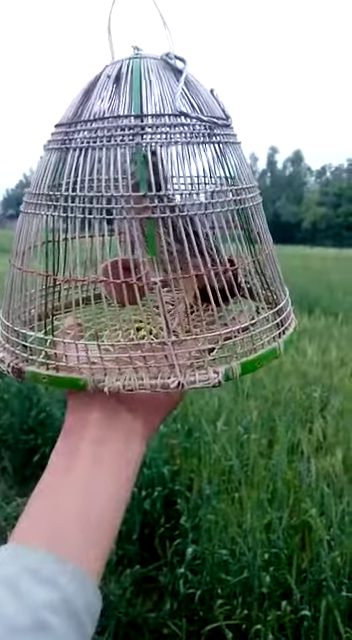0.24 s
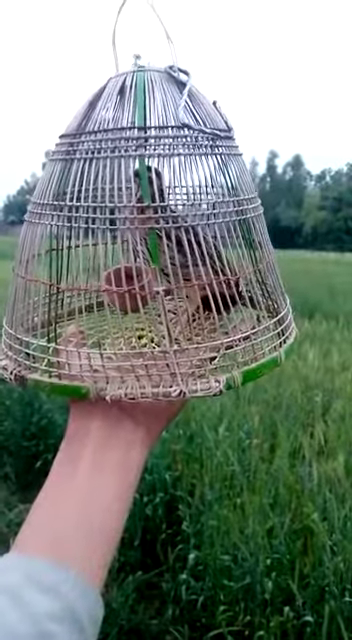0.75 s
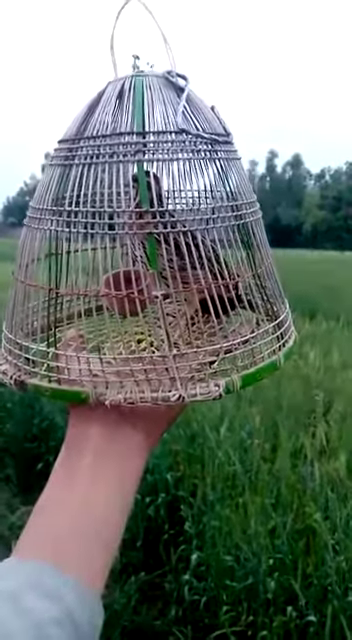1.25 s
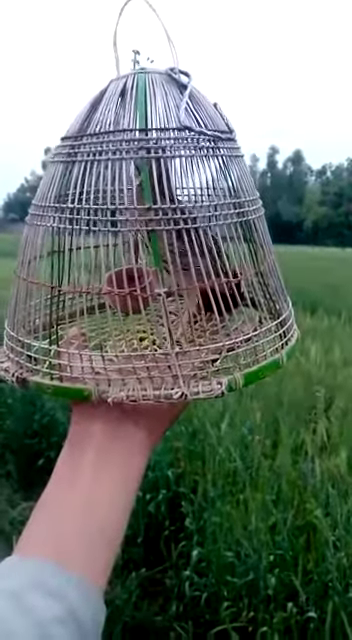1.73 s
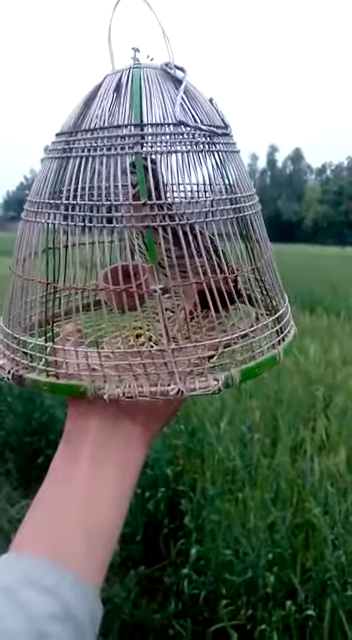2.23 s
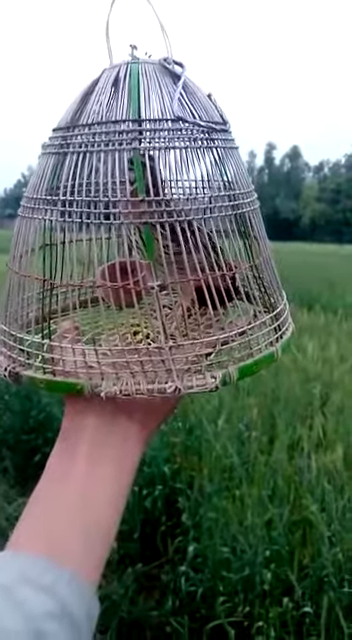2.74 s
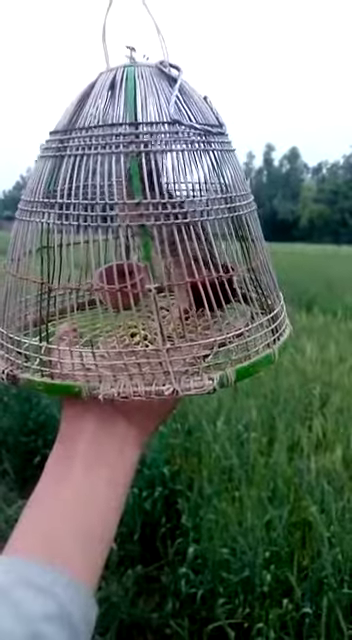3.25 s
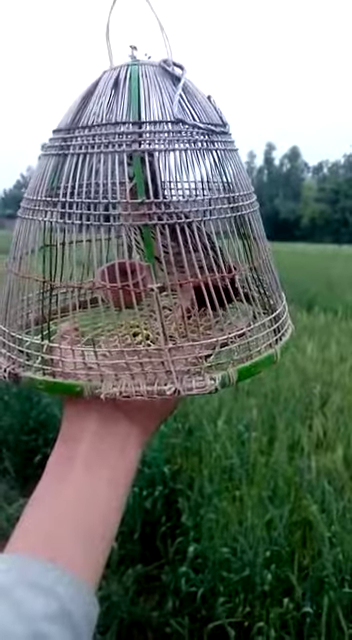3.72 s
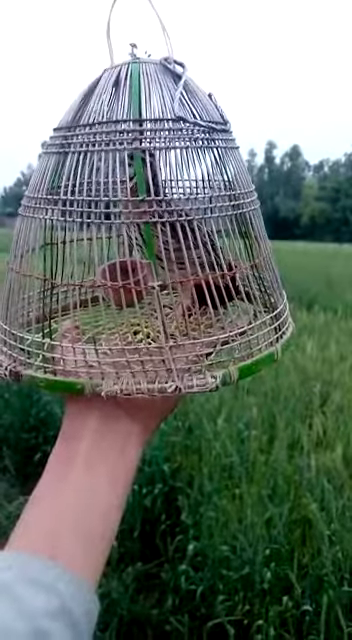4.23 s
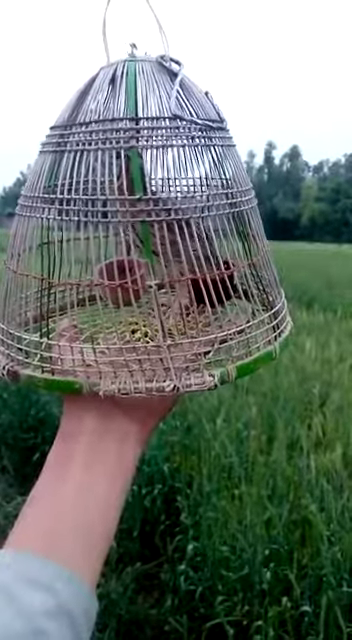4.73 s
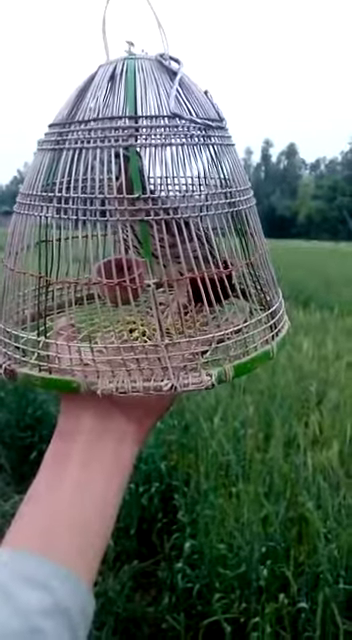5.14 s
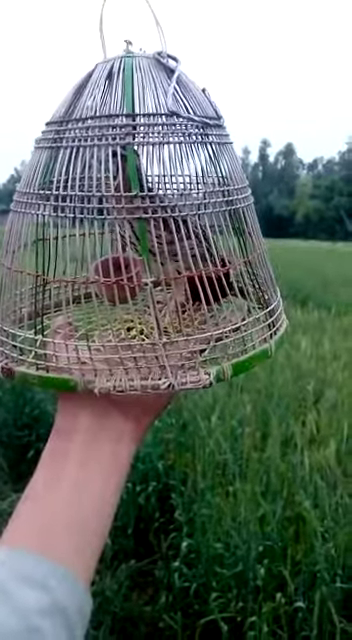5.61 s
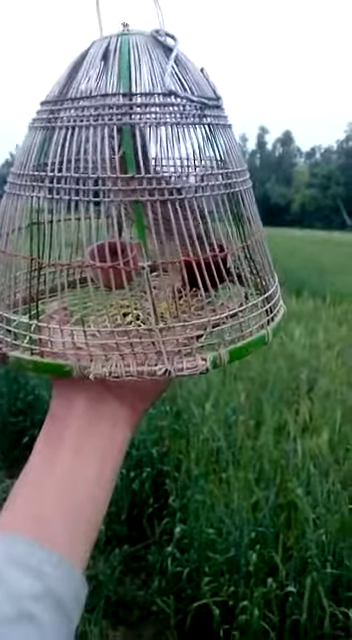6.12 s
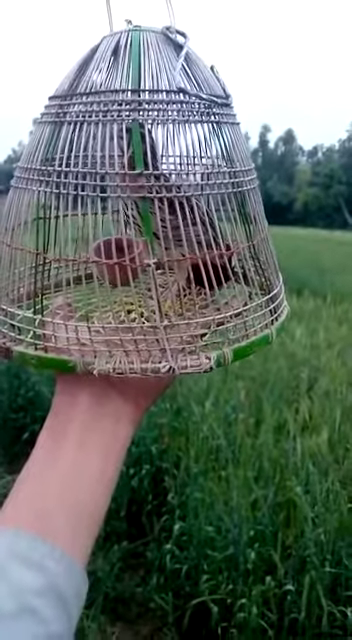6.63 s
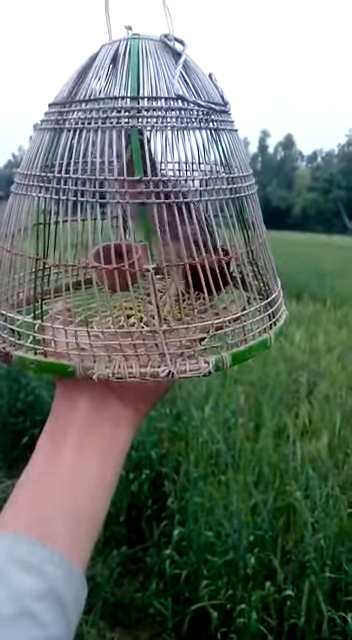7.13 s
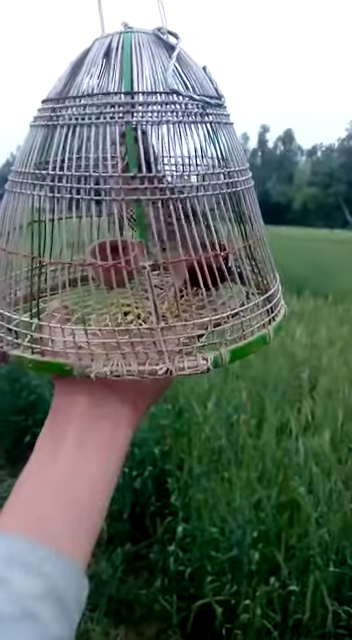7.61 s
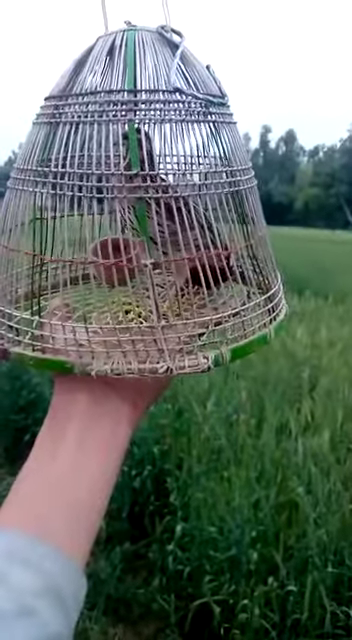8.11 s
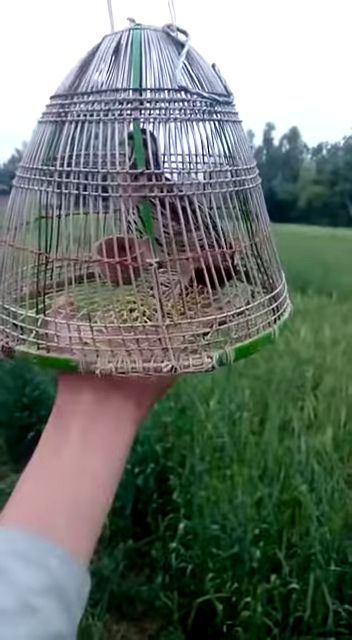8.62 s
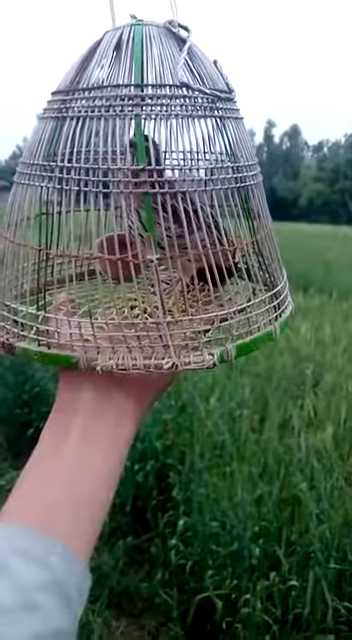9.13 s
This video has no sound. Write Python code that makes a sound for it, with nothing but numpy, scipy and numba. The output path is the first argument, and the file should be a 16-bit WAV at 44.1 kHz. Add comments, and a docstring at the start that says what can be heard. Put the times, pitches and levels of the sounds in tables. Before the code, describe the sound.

Piercing paired quail calls, each note whipping upward, repeat every second and a half over quiet field air, then distant birds twitter.

```python
"""From the start a quail in a hand-held wicker cage calls six times: a long and a short near-sine note, each whipping up.
Cage notches, a ground bounce, crop scatter and a train of tree-line echoes colour every call.
From the third call on, small birds chirp far off as gliding sines, and shaped noise bumps softly on the microphone.
After the last call a distant flock twitters; filtered noise makes field rumble, hum and leaf hiss throughout.
The phone's limiter holds the calls level and ducks the background under them."""
import sys
import numpy as np
from scipy import signal
from scipy.fft import rfft, irfft, next_fast_len
from scipy.io import wavfile
from scipy.ndimage import uniform_filter1d, minimum_filter1d
from numba import njit

SR = 44100
rng = np.random.default_rng(int(sys.argv[2]) if len(sys.argv) > 2 else 0)


def put_to_file(sound):
    """Save the sound as 16-bit audio at rate SR, in the file named by the first command-line argument."""
    columns = np.atleast_2d(sound).T  # one column per channel
    safe = np.clip(columns, -1, 1)
    whole_steps = np.round(safe * 32767)
    wavfile.write(sys.argv[1], SR, whole_steps.astype(np.int16))


N = 412776
T = np.arange(N) / SR


def undb(db):
    """Decibels to gain."""
    return 10 ** (np.asarray(db) / 20)


def unit(x):
    """Scale to rms 1."""
    return x / np.sqrt(np.mean(x ** 2))


def add(out, s, x):
    """Mix x into out from time s (seconds) on."""
    i = max(int(round(s * SR)), 0)
    part = x[:max(len(out) - i, 0)]
    out[i:i + len(part)] += part


def colour(x, points):
    """Filter by a curve of (Hz, dB) points, joined by straight lines over log frequency."""
    hz, db = np.transpose(points)
    size = next_fast_len(len(x) + 4096)
    f = np.maximum(np.fft.rfftfreq(size, 1 / SR), 1)
    gain = undb(np.interp(np.log(f), np.log(hz), db))
    return irfft(rfft(x, size) * gain, size)[:len(x)]


def walk(size, rate):
    """Random wandering with a spread near 1, joining `rate` random points per second."""
    return np.interp(np.arange(size) / SR * rate, np.arange(512), rng.standard_normal(512))


# Closing whip: pitch rise reached at the upswing time, and its e-folding time
WHIP_HZ, WHIP_GROWTH_S = 1620, 0.009
# The voice thins on the way up, then drops and sags at the crest
THIN_DB_PER_OCTAVE, CREST_DB, CREST_FADE_DB_PER_S, CREST_SAG_HZ_PER_S = -7, -14.5, -650, -9000
ATTACK_S, CREST_HOLD_S, BREAK_S = 0.004, .019, 0.0019
# Hoarse little squeak as the syrinx opens; rasp is its pitch wander as a share
SQUEAK_HZ, SQUEAK_S, SQUEAK_LEAD_S, SQUEAK_RASP = 5660, 0.013, .009, 0.021
# Hiss of air that rides on the whip. Each row: frequency in Hz, filter gain in dB.
WHIP_HISS_CURVE = [(2600, -53.5), (3800, -2), (12000, 2)]
# Higher overtones. Each row: multiple of the pitch, level in dB before the strain of the climb.
HIGH_OVERTONES = [(3, -42), (4, -46)]


def whistle(swing_s, low_hz, scoop_hz, scoop_s, creep_hz_per_s, crest_hz, onset_db, swell_s, octave_db, squeak_db,
            waver=.001, shimmer_db=1.11, strain_db=12, rasp=0.021, rasp_s=0.0062, hiss_db=-39):
    """One nearly pure note: it scoops down, lingers low, then whips up over an octave. A squeak leads it."""
    crest_s = swing_s + WHIP_GROWTH_S * np.log((crest_hz - low_hz) / WHIP_HZ)
    t = np.arange(0, crest_s + CREST_HOLD_S, 1 / SR)
    scoop = scoop_hz * np.exp(-(t / scoop_s) ** 2)
    rise_hz = WHIP_HZ * np.exp((t - swing_s) / WHIP_GROWTH_S)
    top_hz = crest_hz + CREST_SAG_HZ_PER_S * (t - crest_s)
    pitch = np.minimum(low_hz + scoop + creep_hz_per_s * t + rise_hz, top_hz)
    pitch = uniform_filter1d(pitch, size=130)
    ratio = pitch / low_hz

    # effort swells, the voice thins as it climbs, and it breaks at the crest
    swell = np.sin(np.pi / 2 * np.minimum(t / swell_s, 1)) ** 2
    break_db = CREST_DB * (1 + np.tanh((t - crest_s + BREAK_S) / BREAK_S)) / 2
    spent_db = break_db + CREST_FADE_DB_PER_S * np.maximum(t - crest_s, 0)
    effort_db = onset_db * (1 - swell) + THIN_DB_PER_OCTAVE * np.log2(ratio) + spent_db

    # the higher the pitch, the tighter the syrinx: brighter, and raspy during the upward whip
    strain = np.clip((ratio - 1) / 0.2, 0, 1)
    whip = np.exp(-((t - swing_s) / rasp_s) ** 2)
    hz = pitch * (1 + waver * walk(len(t), 280) + rasp * whip * walk(len(t), 2500))
    phase = 2 * np.pi * np.cumsum(hz) / SR
    tone = np.sin(phase) + undb(octave_db) * np.sin(2 * phase)
    for multiple, db in HIGH_OVERTONES:
        audible = np.clip((SR / 2 - multiple * hz) / 2000, 0, 1)  # fades out below half the sample rate
        tone = tone + audible * undb(db + strain_db * strain) * np.sin(round(multiple) * phase)
    tone = tone + undb(hiss_db) * whip * colour(rng.standard_normal(len(t)), WHIP_HISS_CURVE)

    fade = np.sin(np.pi / 2 * np.minimum(np.minimum(t, t[-1] - t) / ATTACK_S, 1)) ** 2
    note = tone * fade * undb(effort_db + shimmer_db * walk(len(t), 200))
    note = np.pad(note, (int(SQUEAK_LEAD_S * SR), 0))
    squeak_hz = SQUEAK_HZ * (1 + SQUEAK_RASP * walk(int(SQUEAK_S * SR), 1500))
    squeak = np.hanning(len(squeak_hz)) * np.sin(2 * np.pi * np.cumsum(squeak_hz) / SR)
    add(note, 0, undb(squeak_db) * squeak)
    return note


# How each kind of note is sung: scoop from above, upward creep, crest pitch, level at onset,
# time to swell, and levels of the octave and the squeak; units stand in the setting names.
LONG_SINGING = dict(scoop_hz=465, scoop_s=.023, creep_hz_per_s=0, crest_hz=7410, onset_db=-10.5, swell_s=0.09, octave_db=-35.5, squeak_db=-46)
SHORT_SINGING = dict(scoop_hz=1020, scoop_s=.0025, creep_hz_per_s=2600, crest_hz=7570, onset_db=-16.5, swell_s=0.03, octave_db=-29.5, squeak_db=-62)


def quail(long_note, short_note):
    """One call: two whistles of the syrinx, long then short; the sound starts at the time returned."""
    out = np.zeros(SR // 2)
    start_s = long_note[0] - 1 / 20  # room for the leading squeak
    for (s, swing_s, low_hz, db), style in ((long_note, LONG_SINGING), (short_note, SHORT_SINGING)):
        add(out, s - SQUEAK_LEAD_S - start_s, undb(db) * whistle(swing_s, low_hz, **style))
    return start_s, out


def scatter(t, rise_s, t60_s):
    """Echoes of countless stalks or leaves: noise that swells and dies away, with energy 1."""
    decay = np.exp(-np.log(1000) * t / t60_s)
    tail = rng.standard_normal(len(t)) * (1 - np.exp(-(t / rise_s) ** 2)) * decay
    return tail / np.sqrt(np.sum(tail ** 2))


GROUND_LAG_S, GROUND_DB = .0115, -26
# Each further row of a stand answers later and, on average, weaker
ROW_LAG_S, ROW_FALL_DB, ROW_COUNT = 0.02, -6, 3
# Pitches that reflections in the cage cancel. Each row: centre in Hz, width in Hz, depth in dB.
CAGE_NOTCHES = [(3235, 160, -12), (3520, 250, -17), (3830, 260, -7), (4550, 260, -11), (4980, 200, -7),
                (5230, 200, -16), (5590, 130, -16), (5920, 150, -16), (6280, 220, -10), (6830, 600, -15)]
# Stands of trees between the fields.
# Each row: echo delay in seconds, level of the front row in dB before random sway and air loss.
TREE_ECHOES = [(.137, -42.5), (.186, -44), (.217, -51.5), (.296, -51.5), (.468, -47.5), (.614, -56),
               (.77, -61.5), (.921, -67), (1.11, -73)]


def outdoors(call, crop_db=-34, far_db=-45, air_db=5.5, smear_db=-4, crop_loss_s=.1, far_loss_s=0.97,
             blur_db=12, sway_db=1.6):
    """The direct call through the cage's notches, plus ground bounce, crop scatter and tree echoes."""
    size = 2 * SR
    t, f = np.arange(size) / SR, np.fft.rfftfreq(size, 1 / SR)
    # each note dips as it glides through a cancelled pitch
    cage = 1
    for hz, width_hz, db in CAGE_NOTCHES:
        detune = hz ** 2 - f ** 2
        damping = 1j * f * width_hz
        cage = cage * (detune + damping * undb(db)) / (detune + damping)
    near = cage + undb(GROUND_DB) * np.exp(-2j * np.pi * f * GROUND_LAG_S)

    # air takes the treble: dB per second of travel, equal to air_db at 4 kHz
    loss_db = air_db * (f / 4000) ** 2
    crop = undb(crop_db - crop_loss_s * loss_db) * rfft(scatter(t, rise_s=0.0042, t60_s=.2))
    far = undb(far_db - far_loss_s * loss_db) * rfft(scatter(t, rise_s=0.2, t60_s=2.1))

    trees = 0
    for delay_s, db in TREE_ECHOES:
        # the further the trees, the more their foliage blurs the echo
        blur = undb(smear_db + blur_db * delay_s)
        stand = np.zeros(size)
        for row in range(ROW_COUNT):
            foliage = blur * scatter(t[:SR // 10], rise_s=0.00033, t60_s=0.012)
            foliage[0] += 1
            row_db = db + row * ROW_FALL_DB + sway_db * rng.standard_normal()
            add(stand, delay_s + row * ROW_LAG_S, undb(row_db) * foliage / np.hypot(1, blur))
        trees = trees + undb(-delay_s * loss_db) * rfft(stand)

    response = irfft(near + crop + far + trees, size)[:-SR // 10]
    return signal.fftconvolve(call, response)[:N]


def chirps(table, glide, arch, buzz, flutter_db=3):
    """One kind of small bird: fluttering sines that glide by a share of their pitch along a slight arch."""
    out = np.zeros(N)
    for s, length_s, start_hz, db in table:
        size = int(max(length_s, .02) * SR)
        along = np.linspace(0, 1, size)
        path_hz = start_hz * (1 + glide * along + arch * np.sin(np.pi * along))
        hz = path_hz * (1 + buzz * walk(size, 900))
        loudness = undb(db + flutter_db * walk(size, 53)) * signal.windows.tukey(size, .5)
        add(out, s, loudness * np.sin(2 * np.pi * np.cumsum(hz) / SR))
    return out


# A flock still further off twitters at random within one octave
FLOCK_START_S, FLOCK_LASTS_S, FLOCK_LOW_HZ, FLOCK_NOTE_S, FLOCK_DB = 7.9, 1.4, 2330, 0.0705, -74
# Far birds: high falling buzzes, rising whistles, low falling slurs.
# Each row: start in seconds, length in seconds, start pitch in Hz, level in dB before flutter and blur.
HIGH_BUZZES = [(2.732, 0.13, 4890, -62.5), (5.63, 0.11, 5470, -60), (7.1, 0.033, 7440, -70),
               (7.865, .14, 6890, -59.5), (8.803, .13, 4930, -62), (8.967, 0.065, 5070, -61),
               (9.25, .11, 7000, -80.5)]
RISING_PIPINGS = [(8.24, 0.083, 3670, -59), (8.39, .09, 3650, -67.5), (8.712, 0.098, 3560, -63),
                  (9.04, 0.086, 3620, -72)]
LOW_SLURS = [(7.979, 0.12, 2960, -65.5), (8.125, 0.043, 3150, -61), (8.416, .16, 2797, -66),
             (8.58, 0.29, 2800, -70.5), (8.89, .15, 2925, -63), (9.28, .08, 2790, -73.5)]


def far_birds(wet_db=-3):
    """Three kinds of small bird and a twittering flock; noise-like scatter blurs them with distance."""
    flock = [(FLOCK_START_S + when * FLOCK_LASTS_S, FLOCK_NOTE_S, FLOCK_LOW_HZ * 2 ** octave, FLOCK_DB)
             for when, octave in rng.random(size=(22, 2))]
    out = chirps(HIGH_BUZZES, glide=-0.19, arch=0.0064, buzz=.06)
    out += chirps(RISING_PIPINGS, glide=0.0874, arch=0.022, buzz=0.0082)
    out += chirps(LOW_SLURS, glide=-.24, arch=-0.045, buzz=0.056)
    out += chirps(flock, glide=-.1, arch=.03, buzz=0.018)
    blur = scatter(T[:SR], rise_s=0.012, t60_s=0.28)
    return out + undb(wet_db) * signal.fftconvolve(out, blur)[:N]


BUMP_DB, BUMP_EDGE_S = 5, 0.015  # added to every level; added at both ends of every bump
# Air bumping on the microphone.
# Each row: start in seconds and length in seconds without the edges, level in dB before BUMP_DB.
AIR_BUMPS = [(2.997, 0.03, -46), (3.05, 0.1, -50.5), (3.293, 0.022, -48.5), (3.473, 0.068, -57),
             (3.964, 0.16, -57), (4.438, 0.11, -59), (4.654, 0.16, -57.5)]


def bumps():
    """Short low puffs of air on the microphone: bass noise under rounded envelopes."""
    push = np.zeros(N)
    for s, length_s, db in AIR_BUMPS:
        envelope = np.hanning(int((length_s + 2 * BUMP_EDGE_S) * SR))
        add(push, s - BUMP_EDGE_S, undb(db + BUMP_DB) * envelope)
    thud_curve = [(25, -29), (65, 6.5), (115, -4.5), (200, -16.0), (500, -49), (2000, -96.0)]  # Hz, dB
    return push * unit(colour(rng.standard_normal(N), thud_curve))


def noise_patches(shape, frames, bands):
    """Random gains of rms 1, averaged over neighbouring time frames and frequency bands."""
    smooth = uniform_filter1d(rng.standard_normal(shape), size=frames, axis=1)
    return unit(uniform_filter1d(smooth, size=bands, axis=0))


# Open-air rumble. Each row: frequency in Hz, relative level in dB.
FIELD_CURVE = [(15, -44.5), (25, -12), (70, 1.5), (124, -3.5), (157, -2.5), (187, -6.5), (237, -6),
               (278, -10.5), (339, -6.5), (421, -12.5), (703, -12.5), (840, -16), (1090, -13),
               (1680, -14.5), (2800, -28), (3640, -53), (6160, -120)]
# Leaves in the distance. Each row: frequency in Hz, relative level in dB.
LEAVES_CURVE = [(1800, -23), (2700, -6.5), (3500, 8), (4600, -3.5), (5800, -4.5), (7000, -20.5),
                (7700, -16), (8200, -1.5), (10000, -6.5), (15500, -12.5)]
# Strength of the breeze. Each row: time in seconds, rumble level in dB before flicker.
BREEZE_LEVEL = [(0, -65.5), (.7, -65), (1.2, -61), (2.2, -64), (3.5, -66), (4.5, -66), (5.4, -68.5),
                (6.3, -65.5), (7.6, -67.5), (8.4, -63.5), (9.36, -65.5)]
# Narrow humming bands in the far rumble. Each row: centre in Hz, filter width in Hz, level in dB.
DRONE_BANDS = [(72, 17, -71.5), (238, 27, -78), (332, 63, -79.5), (694, 55, -87), (1552, 370, -80.5)]


def background(leaves_db=-73, flicker_db=0.1, patchy_db=3.5, ripple_db=0.5, drift_db=1.1):
    """Far rumble and leaf hiss, noises that swell with the breeze, over steady humming bands."""
    breeze_db = np.interp(T, *np.transpose(BREEZE_LEVEL)) + flicker_db * walk(N, 18)
    rumble = unit(colour(rng.standard_normal(N), FIELD_CURVE)) * undb(breeze_db)
    leaves = unit(colour(rng.standard_normal(N), LEAVES_CURVE))
    leaves = leaves * undb(leaves_db + breeze_db - breeze_db.mean())
    drone = np.zeros(N)
    for hz, width_hz, db in DRONE_BANDS:
        b, a = signal.iirpeak(hz, hz / width_hz, SR)
        # the same resonance twice over, for steeper sides
        hum = signal.lfilter(b, a, signal.lfilter(b, a, rng.standard_normal(N)))
        drone += undb(db) * unit(hum)

    cells = signal.stft(rumble + leaves, nperseg=2048)[2]
    # narrow bands flicker, wider patches swell and sink more slowly
    flicker = noise_patches(cells.shape, frames=4, bands=2)
    drift = noise_patches(cells.shape, frames=14, bands=6)
    # reflections from the ground leave a steady ripple across the spectrum
    ripple = rng.standard_normal((len(cells), 1))
    cell_db = patchy_db * flicker + drift_db * drift + ripple_db * ripple
    return signal.istft(cells * undb(cell_db))[1][:N] + drone


# The long first note and the short second note of each call.
# Each row: start in seconds, time to the upswing in seconds, base pitch in Hz,
# level in dB before the note's own shaping and the limiter.
FIRST_NOTES = [(0.1078, 0.092, 3325, 6), (1.5007, 0.091, 3336, 8), (2.8984, 0.0915, 3349, 7.5),
               (4.2949, 0.092, 3355, 7), (5.718, 0.092, 3377, 7.5), (7.1554, 0.0935, 3371, 6)]
SECOND_NOTES = [(0.391, 0.063, 3179, 7.5), (1.781, 0.063, 3210, 7.5), (3.1779, 0.064, 3202, 7),
                (4.5754, 0.064, 3203, 6.5), (5.9984, 0.065, 3213, 6.5), (7.4389, 0.0625, 3203, 7)]


def scene():
    """The quail close by, all else far behind; the foliage moves, so every call echoes a little differently."""
    out = far_birds() + background() + bumps()
    for long_note, short_note in zip(FIRST_NOTES, SECOND_NOTES):
        start_s, call = quail(long_note, short_note)
        add(out, start_s, outdoors(call))
    return out[None]


@njit
def follow(x, release):
    """Peak follower: jumps up at once, sinks by a fixed share each sample."""
    out, e = np.empty(len(x)), 0.
    for i in range(len(x)):
        e = max(x[i], e * release)
        out[i] = e
    return out


TOP_HZ = 15900  # cut-off
# Microphone colour. Each row: frequency in Hz, gain in dB.
MIC_CURVE = [(20, -2.5), (7550, -0.5), (7950, -11), (9000, -18.5), (10300, -21.5), (11400, -12.5),
             (12400, -17.5), (13500, -22), (15000, -11), (16000, -16.5)]


def record(dry, ceiling_db=-7.5, hold_s=0.031, release_s=0.0078):
    """A look-ahead limiter with a short hold, then the phone's dull top octave and cut-off."""
    x = dry[0]
    hold = int(max(hold_s, .002) * SR) | 1  # odd number of samples
    # highest level within the hold time just past
    peak = -minimum_filter1d(-np.abs(x), hold, origin=hold // 2)
    level = follow(peak, np.exp(-1 / (release_s * SR)))
    gain = np.minimum(1, undb(ceiling_db) / (level + 1e-9))
    # look ahead: the gain starts down before the peak arrives, along a smooth slope
    gain = uniform_filter1d(minimum_filter1d(gain, size=180), size=180)
    cutoff = signal.ellip(10, .1, 80, TOP_HZ, fs=SR, output="sos")
    return signal.sosfilt(cutoff, colour(x * gain, MIC_CURVE))[None]


dry = scene()
out = record(dry)
put_to_file(out)
```